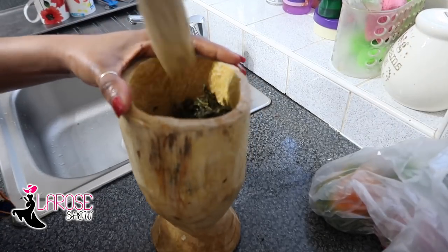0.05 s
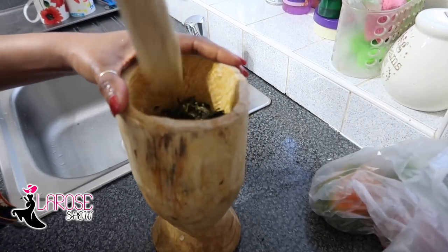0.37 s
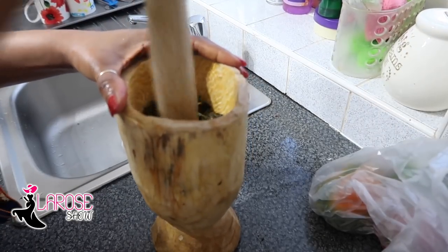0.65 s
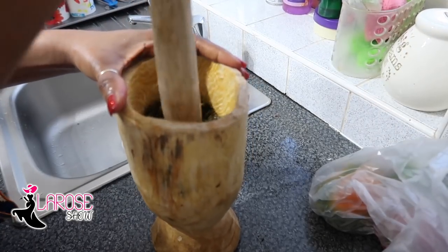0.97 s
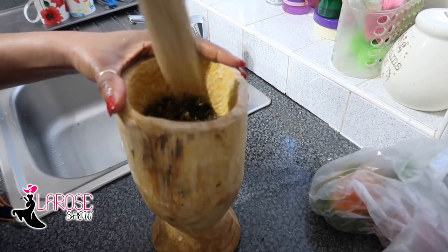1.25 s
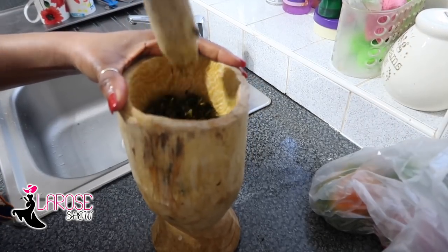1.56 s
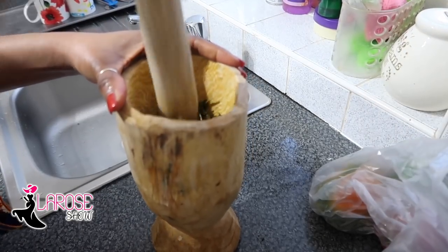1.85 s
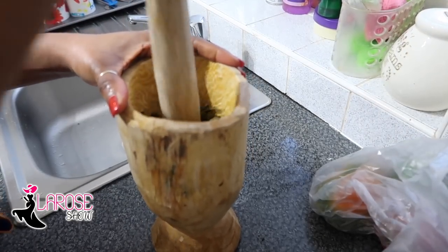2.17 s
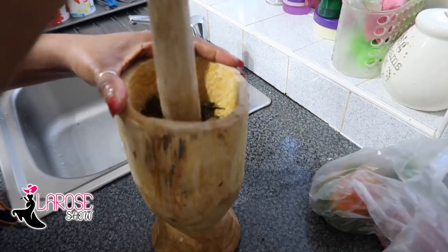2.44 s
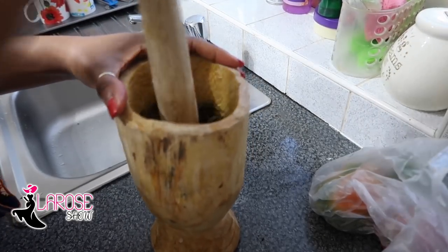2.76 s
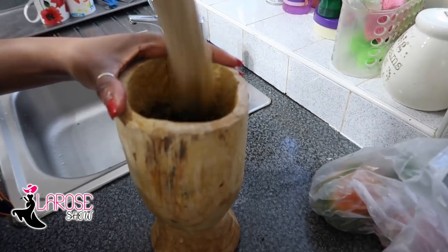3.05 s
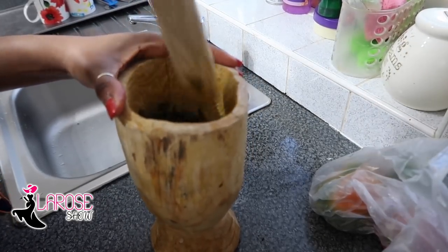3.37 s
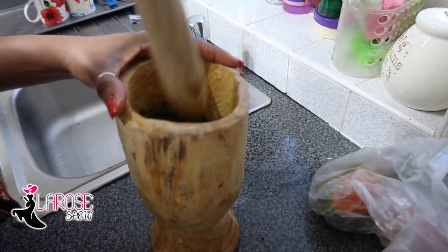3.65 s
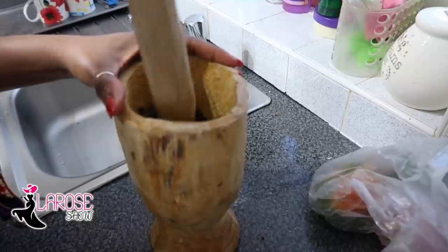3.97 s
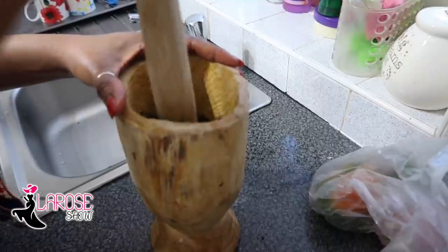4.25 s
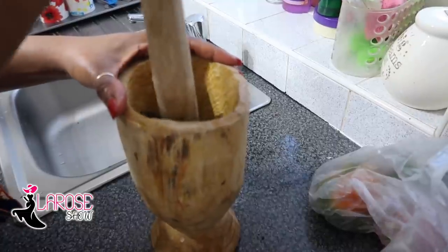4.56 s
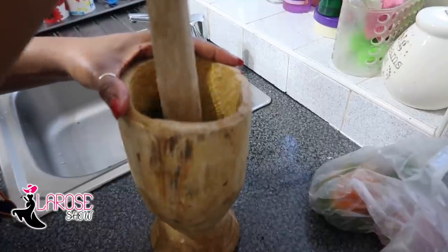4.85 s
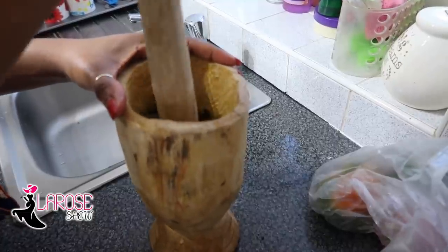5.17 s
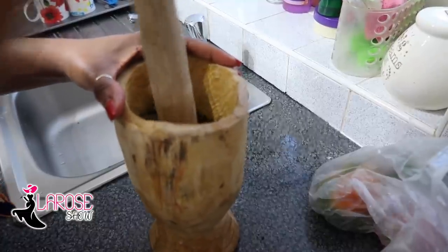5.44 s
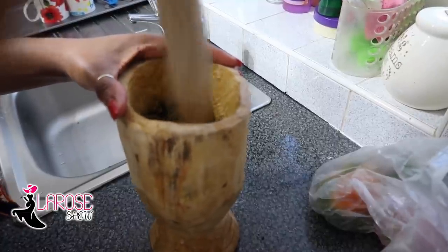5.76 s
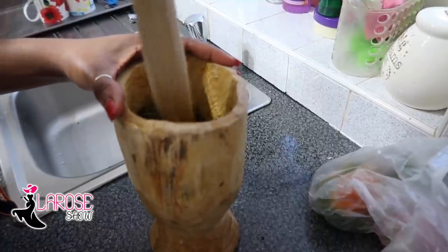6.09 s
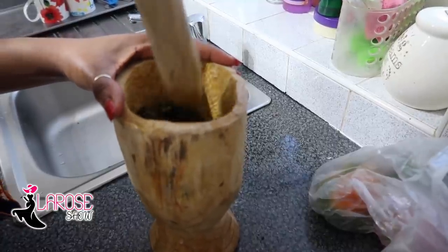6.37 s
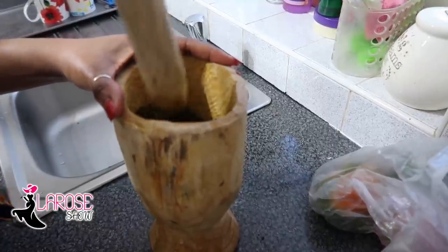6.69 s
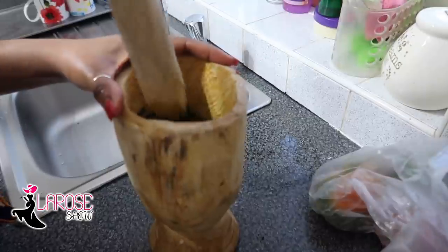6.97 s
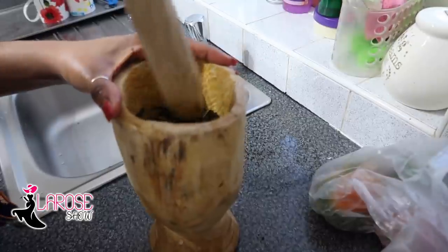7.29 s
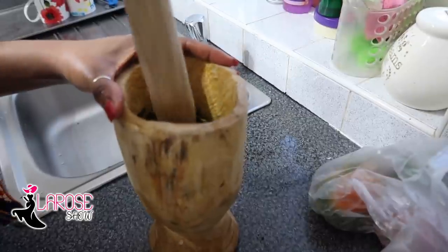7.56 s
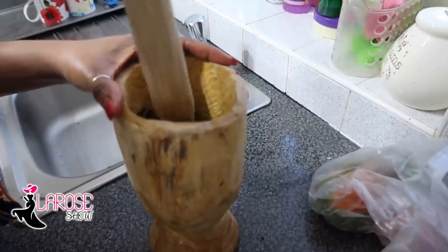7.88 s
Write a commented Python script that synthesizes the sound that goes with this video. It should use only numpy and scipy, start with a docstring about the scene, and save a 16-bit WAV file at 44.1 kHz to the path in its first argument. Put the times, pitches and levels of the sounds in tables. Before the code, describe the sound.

A wooden pestle pounds leaves in a wooden mortar on a kitchen counter, heard close up. The strokes start at about 0.2 seconds and continue to the end at 8 seconds, roughly three a second, quickening slightly. Each begins with a short wet crunch of leaves and lands as a dull, hollow wooden knock with a low thud from the counter. The force is uneven: harder, sharper blows come at about 1.0, 4.5 and 5.5 seconds, and softer ones near 1.8, 4.9 and 6.2 seconds. Now and then the pestle clips the wall of the bowl. Tiny pops of juice accompany many strokes between 2 and 7 seconds, and some lifts give a quiet sticky squelch, with a faint rustle of pulp in between. The mortar rubs faintly on the counter near 3.1 seconds. The tiled room adds a brief ring over a faint, low steady noise.

```python
"""A tiled kitchen: on the counter, a wooden pestle pounds leaves in a wooden mortar about three times
a second. Each stroke crunches wetly through the leaves, squashes them, rings the wood of the bowl
and thuds into the counter. Some lifts of the pestle squelch, and the pulp rustles faintly in between.
The room rings briefly over a faint steady noise; a limiter ducks the hardest blows."""
import sys
import numpy as np
from scipy import signal
from scipy.fft import rfft, irfft
from scipy.io import wavfile
from scipy.ndimage import uniform_filter1d

SR = 44100
rng = np.random.default_rng(int(sys.argv[2]) if len(sys.argv) > 2 else 0)


def store_pcm(level_fs):
    """Save levels as 16-bit WAV."""
    pcm = np.round(np.clip(level_fs, -1, 1) * 32767).astype(np.int16)
    wavfile.write(sys.argv[1], SR, np.atleast_2d(pcm).T)


N = 353682


def gain_of(db):
    """Decibels to amplitude."""
    return 10 ** (np.asarray(db) / 20)


def unit_rms(x):
    """Scales to rms 1."""
    return x / np.sqrt(np.mean(x ** 2) + 1e-20)


def curve_at(points, hz, column=1):
    """One table column, interpolated over log frequency."""
    table = np.transpose(points)
    return np.interp(np.log(hz + 1), np.log(table[0] + 1), table[column])


def add(mix, start_s, sound):
    """Adds a sound to the mix in place."""
    part = mix[max(round(start_s * SR), 0):][:len(sound)]
    part += sound[:len(part)]


def coloured(x, spectrum):
    """Filters by a spectrum, keeping the power of white input."""
    hz = np.fft.rfftfreq(len(x), 1 / SR)
    return irfft(rfft(x) * unit_rms(gain_of(curve_at(spectrum, hz))), len(x))


def resonator(x, hz, decay_per_s):
    """Two-pole resonance."""
    radius = np.exp(-decay_per_s / SR)
    return signal.lfilter([1], [1, -2 * radius * np.cos(2 * np.pi * hz / SR), radius ** 2], x)


# Stereo field. Each row: frequency in Hz, left-right coherence.
COHERENCE = [(200, 1), (500, .985), (1000, .92), (2000, .83), (4000, .25), (15000, .2)]

def stereo_pair(a, b):
    """Two unrelated signals become two channels, alike in the bass and less so in the treble."""
    coherence = curve_at(COHERENCE, np.fft.rfftfreq(len(a), 1 / SR))
    mid = rfft(a) * np.sqrt((1 + coherence) / 2)
    side = rfft(b) * np.sqrt((1 - coherence) / 2)
    return irfft(np.array([mid + side, mid - side]), len(a))


# Microphone pair. Each row: frequency in Hz, lead of the left channel in radians.
PORT_PHASE = [(0, 0), (3000, .05), (4100, .4), (4800, 1.6), (6500, .4), (9000, .4), (11000, 1.7)]

def microphone_ports(x):
    """The close sound reaches the two ports out of step in the treble."""
    phase = curve_at(PORT_PHASE, np.fft.rfftfreq(N, 1 / SR))
    return irfft(rfft(x) * np.exp(.5j * np.array([phase, -phase])), N)


# Background noise. Each row: frequency in Hz, relative density in dB.
ROOM_NOISE_SPECTRUM = [(20, -13.5), (45, 7), (90, 3.5), (150, -8.5), (220, -11), (330, -8), (550, -12),
                       (1000, -20), (2000, -29), (4000, -36), (8000, -39), (15000, -51.5)]

def room_noise(level_db=-55.5):
    """Faint steady noise, mostly bass."""
    noises = [coloured(white, ROOM_NOISE_SPECTRUM) for white in rng.standard_normal((2, N))]
    return gain_of(level_db) * stereo_pair(*noises)


# Kitchen reverberation. Each row: frequency in Hz, level in dB, T60 in seconds.
TAIL_BANDS = [(60, -0.5, 0.11), (202, -6, 0.26), (527, -5.5, 0.23), (1030, -5.5, 0.26), (1800, 1, 0.26),
              (3870, -4, 0.29), (9000, 0.5, 0.2), (15500, -14, 0.11)]

def kitchen_tail(x, build_s=0.002):
    """Diffuse tail; the moving arm and pestle excite a slightly different one from moment to moment."""
    hop = SR // 2
    crossfade = np.sqrt(np.hanning(2 * hop))
    padded, out = np.pad(x, (hop, 2 * hop)), np.zeros((2, N + 2 * hop))
    for start in range(0, N + hop, hop):
        hz, t, noise = signal.stft(stereo_pair(*rng.standard_normal((2, hop))), SR, nperseg=256)
        t60_s = curve_at(TAIL_BANDS, hz, column=2)[:, None]
        fade = gain_of(-60 * t / t60_s) * (1 - np.exp(-(t / build_s) ** 2))
        energy = np.sum(fade ** 2, 1, keepdims=True) * t[1] * SR
        fade *= gain_of(curve_at(TAIL_BANDS, hz))[:, None] / np.sqrt(energy)
        block = padded[start:start + 2 * hop] * crossfade
        for channel, tail in zip(out, signal.istft(noise * fade, SR, nperseg=256)[1]):
            add(channel, start / SR, signal.fftconvolve(block, tail))
    return out[:, hop:hop + N]


# Standing waves. Each row: frequency in Hz, relative level in dB, T60 in seconds.
ROOM_MODES = [(121, -16.5, 0.29), (162, -11, 0.27), (203, -25.5, 0.44), (244, -37.5, 0.35)]
# Nearby tiles and counter. Each row: delay in seconds, level in dB.
ECHOES = [(0.021, -34), (0.0268, -22)]

def room_reflections(x, build_s=0.00096):
    """Low standing waves of the room and single echoes from hard surfaces close by."""
    t = np.arange(SR // 2) / SR
    modes = sum(gain_of(db - 60 * t / t60_s) * np.cos(2 * np.pi * hz * t) for hz, db, t60_s in ROOM_MODES)
    response = 400 / SR * modes * (1 - np.exp(-t / build_s))
    for k, (delay_s, db) in enumerate(ECHOES):
        response[round(delay_s * SR)] += gain_of(db) * (-1) ** k
    return signal.fftconvolve(x, response)[:N]


def with_counter_echo(x, delay_s=.0048, corner_hz=1500, echo_db=-7.5):
    """The hard counter returns a bright copy a moment later."""
    treble = signal.lfilter(*signal.butter(1, corner_hz, "highpass", fs=SR), x)
    return x - gain_of(echo_db) * np.pad(treble, (round(delay_s * SR), 0))[:N]


def with_wall_echo(x, delay_s=.0065, corner_hz=650, echo_db=-8):
    """The wall behind the counter throws the thud straight back and hollows it out."""
    delayed = np.pad(x, (round(delay_s * SR), 0))[:N]
    return x - gain_of(echo_db) * signal.filtfilt(*signal.butter(1, corner_hz, fs=SR), delayed)


def crackle(per_s, spread_db):
    """Tiny snaps of leaf tissue, most small and a few large."""
    size = gain_of(spread_db * np.minimum(rng.exponential(1, N), 4))
    return unit_rms(size * rng.choice([-1, 1], N) * (rng.random(N) < per_s / SR))


def bubbles(per_s, spread_db, cycles, pitches=18):
    """Tiny bubbles of juice burst, each ringing for a few cycles at its own pitch."""
    out = np.zeros(N)
    for hz in np.geomspace(500, 15000, pitches):
        when, polarity, size_draw = rng.random((int(per_s / pitches * N / SR), 3)).T
        size = gain_of(spread_db * np.minimum(-np.log(size_draw), 3))
        pops = np.zeros(N)
        pops[(when * N).astype(int)] = np.sign(polarity - .5) * size
        out += np.sqrt(hz) * unit_rms(resonator(pops, hz, hz / cycles))
    return unit_rms(out)


# Leaf crackle. Each row: frequency in Hz, relative density in dB.
LEAF_SPECTRUM = [(60, -15.5), (400, -22.5), (750, 9.5), (1300, 0), (2300, 1.5), (3800, -3), (6000, -8),
                 (9000, -17), (13000, -16.5), (16000, -27.5)]
# Rustle envelope. Each row: time in seconds, relative level in dB.
RUSTLE_LEVELS = [(0.0, -71), (0.948, -63), (1.2, -87), (3.54, -63.5), (4.078, -76), (8.0, -73)]

def pulp_rustle(gain_db=-3):
    """The wet pulp creeps back with a faint rustle that comes and goes."""
    level = gain_of(gain_db + np.interp(np.arange(N) / SR, *np.transpose(RUSTLE_LEVELS)))
    return level * coloured(crackle(per_s=1000, spread_db=3.5), LEAF_SPECTRUM)


# The mortar shifts. Each row: start in seconds, length in seconds, pitch in Hz, level in dB.
MORTAR_SHIFTS = [(3.117, 0.11, 425, -34.5)]

def mortar_rub(relative_bandwidth=0.11):
    """The foot of the mortar rubs on the counter with a low, narrow groan."""
    out = np.zeros(N)
    for start_s, length_s, hz, db in MORTAR_SHIFTS:
        size = int(length_s * SR)
        rub = resonator(rng.standard_normal(SR), hz, np.pi * relative_bandwidth * hz)[-size:]
        add(out, start_s, gain_of(db) * unit_rms(rub) * signal.windows.tukey(size, .6))
    return out


# Air resonances in the bowl. Each entry: frequency in Hz.
AIR_GAP_HZ = [1420, 1700, 2190, 3400, 4700]

def with_air_gap(x, ring_db=4, width_hz=90):
    """The squelch rings the air between pestle and bowl."""
    rings = sum(signal.lfilter(*signal.iirpeak(hz, hz / width_hz, fs=SR), x) for hz in AIR_GAP_HZ)
    return x + gain_of(ring_db) * rings


# The pestle pulls free. Each row: time in seconds, relative level in dB.
PESTLE_LIFTS = [(0.327, -34.5), (1.859, -47.5), (3.27, -46.5), (5.313, -42.5), (5.963, -53), (6.937, -43.5),
                (7.261, -51.5), (7.573, -45.5)]

def lift_squelches(rise_s=0.0073, fall_s=.0052, smack_s=.0012):
    """Suction builds under the pestle and lets go with a sticky squelch of popping juice."""
    t, level = np.arange(-1500, 4000) / SR, np.zeros(N)
    suction = np.exp(np.minimum(t, 0) / rise_s - np.maximum(t, 0) / fall_s)
    smack = np.exp(-abs(t) / smack_s)
    for free_s, db in PESTLE_LIFTS:
        add(level, free_s + t[0], gain_of(db) * (suction + smack))
    return gain_of(-2) * coloured(level * bubbles(per_s=9000, spread_db=2, cycles=2), LEAF_SPECTRUM)


# Juice bursts just before the pestle bottoms out. Each row: start in seconds, peak level in dB.
JUICE_SPURTS = [(2.1277, -28), (2.486, -23), (3.514, -26.5), (3.8575, -30.5), (4.2, -32.5), (4.5371, -20.5),
                (5.197, -24), (6.177, -29), (6.501, -24), (6.833, -28)]

def juice_spurts(pop_hz=2350, spray=0.18, swell_s=.0005, glide_s=.012):
    """Each pocket of juice pops with a short rising chirp and a fine spray."""
    t, out = np.arange(SR // 100) / SR, np.zeros(N)
    envelope = t / swell_s * np.exp(1 - t / swell_s)
    for start_s, db in JUICE_SPURTS:
        chirp = np.sin(2 * np.pi * pop_hz * rng.uniform(.88, 1.08) * t * (1 + t / glide_s))
        add(out, start_s, gain_of(db) * envelope * (chirp + spray * rng.standard_normal(len(t))))
    return out


# Squashed leaves. Each row: frequency in Hz, relative density in dB.
SQUASH_SPECTRUM = [(40, -23.5), (400, 2), (780, 14.5), (1200, 10), (2300, 7.5), (4000, 3), (6000, -5),
                   (9000, -10.5), (13000, -7.5), (16000, -27)]
# Pestle strokes. Each row: time wood is met in seconds, force in dB, hardness in dB (high on bare wood),
# counter thud in dB, bowl rocking in dB (high off centre), hollow boom in dB over the force,
# sinking time in seconds, wet leaf crunch in dB, squash in dB. Levels are relative.
STROKES = [(0.2149, -15, -3, -20, 1, -20.5, 0.035, -43, -39),
           (0.602, -10.5, -2, -20.5, -7, -9, 0.029, -34, -61),
           (1.005, -6, 0.5, -20, -1, -8, 0.0096, -35.5, -27.5),
           (1.401, -14, 6, -24.5, -11, -4.5, 0.023, -36.5, -41),
           (1.769, -27, -15.5, -53.5, 19, -11, 0.036, -44, -45),
           (2.1301, -13, 5, -21.5, -8.5, -9, 0.022, -37.5, -46),
           (2.4937, -10, -7, -22.5, -36, -12, 0.032, -48, -37),
           (2.8443, -10.5, 0, -23, 3, -21.5, 0.034, -44.5, -35),
           (3.177, -12, -11.5, -24, -22, -9.5, 0.031, -37, -35.5),
           (3.519, -7.5, -7.5, -13.5, -6.5, -14.5, 0.026, -33.5, -32),
           (3.861, -7.5, -2.5, -15.5, -5, -8.5, 0.021, -36, -28),
           (4.203, -18.5, -5, -26.5, 0, -8, 0.024, -40.5, -37),
           (4.533, -16.5, 4, -11.5, 19, 1.5, 0.021, -42.5, -33.5),
           (4.887, -30, -16, -29, -3.5, -16.5, 0.054, -50.5, -47),
           (5.204, -13, -8.5, -22.5, 8.5, -15.5, 0.027, -38, -36.5),
           (5.521, -3, 5.5, -18.5, -2, 0.5, 0.011, -46, -38),
           (5.865, -18.5, 1, -25.5, -11, -14.5, 0.033, -46.5, -47),
           (6.186, -26, -7.5, -28, 1, -23.5, 0.027, -44, -42.5),
           (6.5094, -10, -0.5, -18, 1, -7.5, 0.019, -34.5, -33),
           (6.834, -11, -1.5, -22.5, -22.5, -6.5, 0.033, -54.5, -37),
           (7.1683, -23.5, -12.5, -25.5, 3, -14, 0.037, -53, -44.5),
           (7.478, -24, -11.5, -21, -0.5, -8, 0.028, -41.5, -39.5),
           (7.788, -15, -2.5, -11.5, -5.5, 1.5, 0.034, -43.5, -32)]

def crushed_leaves(rise_s=0.0056, release_s=0.0062, squash_s=.005, bite=0.29, clump_db=3):
    """Juice pops in uneven clumps all the way down, then leaf tissue snaps as the pestle bottoms out."""
    t, crunch, squash = np.arange(N) / SR, np.zeros(N), np.zeros(N)
    for hit_s, *_, sinking_s, crunch_db, squash_db in STROKES:
        flat_s = hit_s - 0.15 * sinking_s  # the leaves are flat just before the wood is met
        near = slice(max(int((flat_s - .1) * SR), 0), int((flat_s + .06) * SR))
        since_flat = t[near] - flat_s
        since_touch = t[near] - (hit_s - sinking_s)
        top_layer = 1 + bite * np.exp(-((since_touch - .006) / 0.0013) ** 2)  # top leaves break first
        contact = (1 + np.tanh(since_touch / rise_s + .5)) / 2
        release = np.exp(-np.maximum(since_flat, 0) / release_s)
        crunch[near] += gain_of(crunch_db) * top_layer * contact * release
        squash[near] += gain_of(squash_db) * contact * np.exp(-abs(since_flat) / squash_s)
    wet_pops = bubbles(per_s=3400, spread_db=4.3, cycles=2.2)
    squash_crackle = crackle(per_s=6000, spread_db=3.6)
    wander = unit_rms(uniform_filter1d(rng.standard_normal(N), size=180))
    clumps = unit_rms(gain_of(clump_db * wander))
    wet_crunch = gain_of(-0.5) * coloured(crunch * wet_pops * clumps, LEAF_SPECTRUM)
    return wet_crunch + gain_of(9.0) * coloured(squash * squash_crackle, SQUASH_SPECTRUM)


# Mortar, pestle and counter. Each row: frequency in Hz, relative level in dB, T60 in seconds.
WOOD_MODES = [(94, 0, .088), (116, -3.5, .06), (168, -8, .045), (203, -2, .055), (244, 2, .065),
              (388, 0, .045), (507, -.5, .033), (592, -1, .022), (750, 0, .013), (850, 1.5, .014),
              (975, -8, .009)]
# Borders between counter thud, bowl body, hollow boom and wooden knock. Each entry: frequency in Hz.
FAMILY_EDGES_HZ = [150, 330, 450]

def wood_ring(t, hardness_db, rocking_db, give_s=0.0017, scatter_db=3, detune=0.037, smear_rad=0.6):
    """One blow's ring in four mode families; harder contact swells faster and favours higher modes."""
    hz, db, t60_s = np.transpose(WOOD_MODES)[:, :, None]
    family = np.digitize(hz[:, 0], FAMILY_EDGES_HZ)
    since = t - 0.0034 * (family == 0)[:, None]  # the heavy counter starts late
    spot, grip, smear = rng.standard_normal((3, len(hz), 1))
    harder_db = hardness_db + 3  # over an ordinary stroke
    # The leaves give way, so the modes swell briefly and start out of step.
    swell_s = (give_s + 0.19 / hz) * .5 ** (harder_db / 15.5)
    envelope = np.exp(np.minimum(since, 0) / swell_s) * gain_of(-60 * np.maximum(since, 0) / t60_s)
    phase = 2 * np.pi * hz * (1 + detune * grip) * t + smear_rad * smear
    rocks = (hz > 150) & (hz < 220)
    tilt_db = 0.5 * harder_db * np.log2(hz / hz[0]) + rocking_db * rocks
    modes = -gain_of(db + tilt_db + scatter_db * spot) * envelope * np.cos(phase)
    return [modes[family == k].sum(0) for k in range(4)]


# Bare wood on wood. Each row: frequency in Hz, relative density in dB.
CRACK_SPECTRUM = [(100, -12.5), (600, 1), (1100, 7), (1700, 11.5), (2500, -1), (3800, -7), (7000, -18.5),
                  (16000, -34.5)]
# Further contacts: the pestle catches the bowl's wall, or bounces back onto the bottom just after a hard blow.
# Each row: time in seconds, force in dB, hardness in dB.
FURTHER_CONTACTS = [(1.0121, -10.5, 0.5), (3.854, -15, -6), (4.519, -17.5, -12), (4.5398, -17, 5),
                    (5.5259, -13, 7.5), (7.115, -43, 17), (7.756, -35, 0.5)]

def pestle_blows(knock_db=-2, further_thud_db=-8.5, crack_rise_s=0.00087, crack_fall_s=0.0016):
    """Strokes and further contacts ring the wood; its highest modes blur into a short dry crack."""
    t, out = np.arange(-1100, 11025) / SR, np.zeros(N)
    attack = (t > -.004) & (t < .02)
    crack_envelope = np.exp(np.minimum(t, 0) / crack_rise_s - np.maximum(t, 0) / crack_fall_s)
    contacts = [row[:6] for row in STROKES]
    contacts += [(hit_s, force_db, hardness_db, force_db + further_thud_db, 0, hardness_db + knock_db)
                 for hit_s, force_db, hardness_db in FURTHER_CONTACTS]
    for hit_s, force_db, hardness_db, thud_db, rocking_db, boom_db in contacts:
        thud, body, boom, knock = wood_ring(t, hardness_db, rocking_db)
        crack = coloured(crack_envelope * rng.standard_normal(len(t)), CRACK_SPECTRUM)
        crack_db = -17 + 1.29 * force_db + 1.9 * hardness_db
        parts = [(thud, thud_db), (body, force_db), (boom, force_db + boom_db),
                 (knock, force_db + hardness_db + knock_db), (crack, crack_db)]
        for part, db in parts:
            add(out, hit_s + t[0], gain_of(db) * part / np.std(part[attack]))
    return gain_of(-4.0) * out


def scene():
    """Mortar and leaves, the kitchen around them and its faint steady noise."""
    pulp = crushed_leaves() + juice_spurts() + pulp_rustle() + with_air_gap(lift_squelches())
    mortar = with_wall_echo(pestle_blows() + pulp + mortar_rub())
    close = microphone_ports(with_counter_echo(mortar) + room_reflections(mortar))
    return room_noise() + close + kitchen_tail(mortar)


def record(dry, low_cut_hz=40, top_hz=15200, ceiling_db=-1, attack_s=0.0037, recovery_db_per_s=45):
    """Low cut, a limiter that ducks the hardest blows, soft clipping, then the band limit."""
    dry = signal.sosfilt(signal.butter(2, low_cut_hz, "highpass", fs=SR, output="sos"), dry)
    peak_db = 20 * np.log10(abs(dry).max(0) + 1e-9)
    recovery_db = np.arange(N) * recovery_db_per_s / SR
    held_db = np.maximum.accumulate(peak_db + recovery_db) - recovery_db
    over_db = np.maximum(held_db - ceiling_db, 0)
    lag = np.exp(-1 / (attack_s * SR))
    ducked = dry / gain_of(0.88 * signal.lfilter([1 - lag], [1, -lag], over_db))
    clipped = .97 * ducked / (1 + ducked ** 8) ** (1 / 8)
    lowpass = signal.firwin(101, top_hz, window=("kaiser", 9), fs=SR)
    return signal.oaconvolve(clipped, lowpass[None], "same")


dry = scene()
out = record(dry)
store_pcm(out)
```